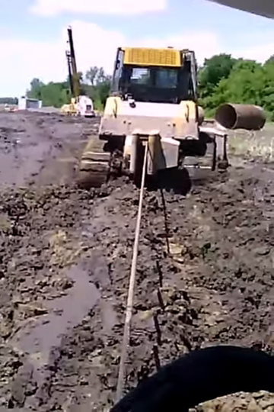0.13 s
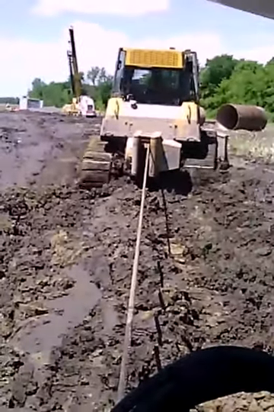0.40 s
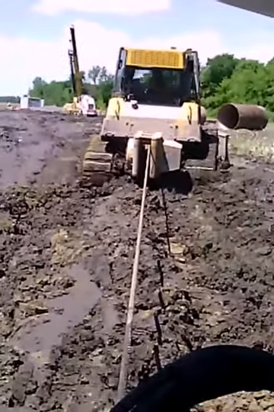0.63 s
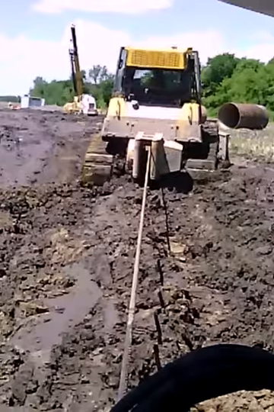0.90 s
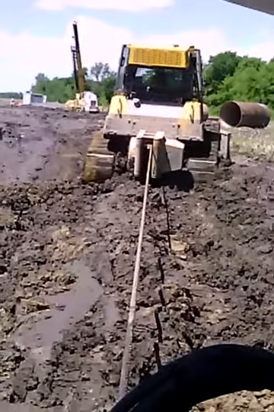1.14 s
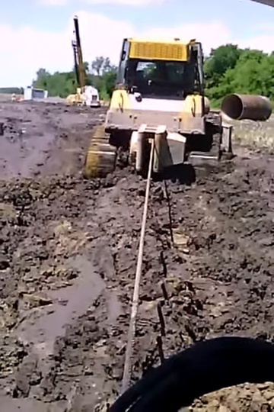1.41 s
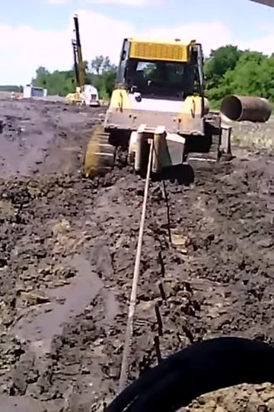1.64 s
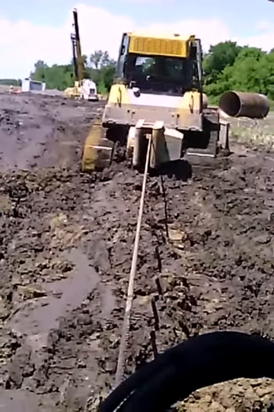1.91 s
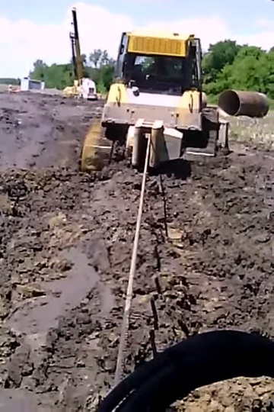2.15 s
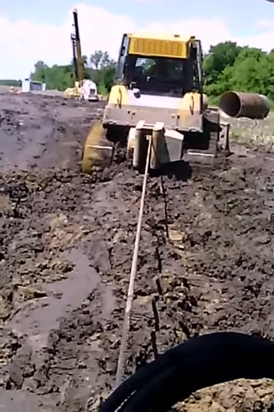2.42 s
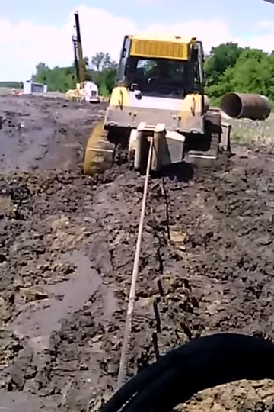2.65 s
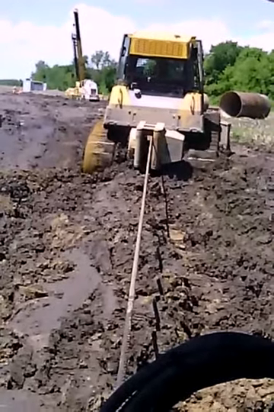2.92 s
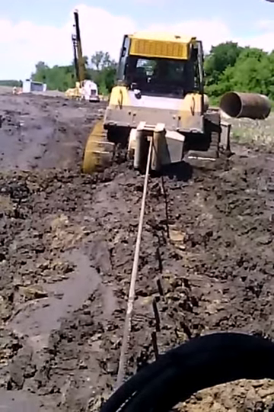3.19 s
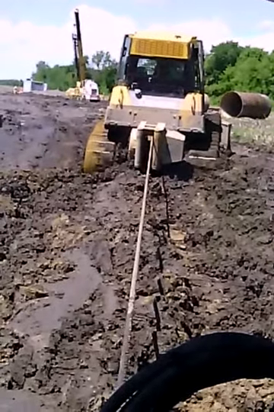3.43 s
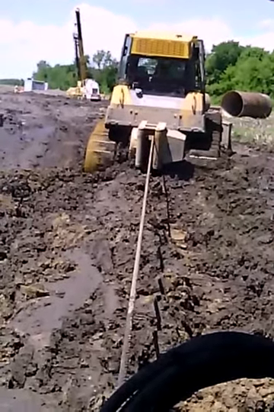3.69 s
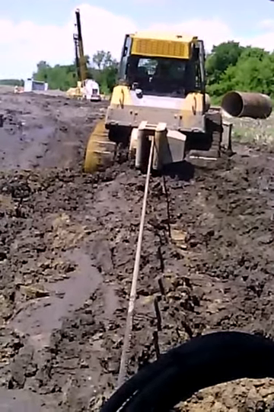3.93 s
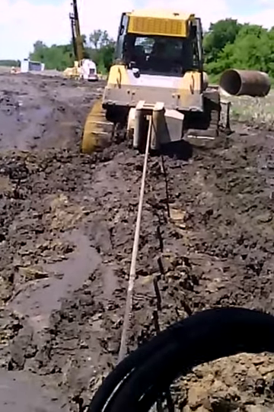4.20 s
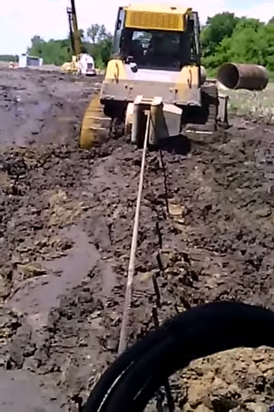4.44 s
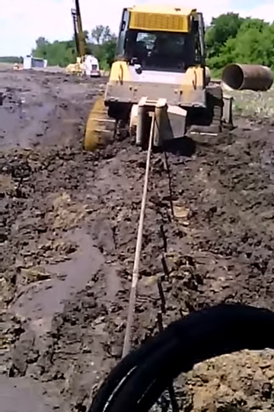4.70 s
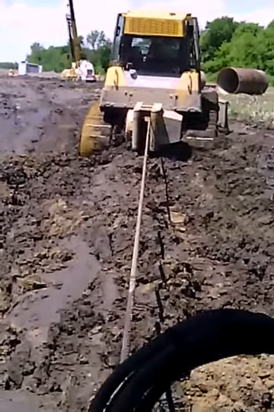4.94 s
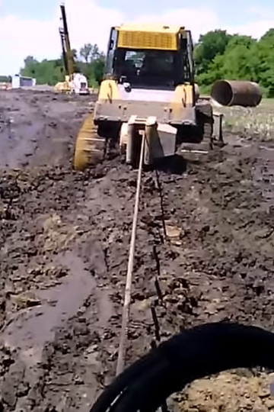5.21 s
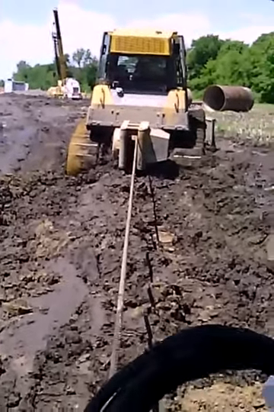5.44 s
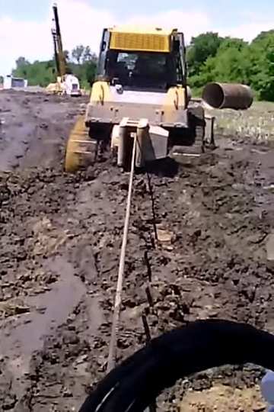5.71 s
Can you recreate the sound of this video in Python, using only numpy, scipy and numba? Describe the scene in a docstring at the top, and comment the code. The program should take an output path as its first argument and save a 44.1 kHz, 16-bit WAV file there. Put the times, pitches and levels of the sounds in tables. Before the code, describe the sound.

Close inside a vehicle cab, a heavy diesel runs at high revs with clatter and air hiss, then sinks quickly to a low, whining idle by two seconds. A panel squeaks in quick pulses. Near the five-second mark, a burst of hiss and a powerful boom arrive as the engine pulls, overloading the microphone; heavy thumps shake the cab at the end.

```python
"""A six-cylinder diesel, heard inside its truck cab on a tow rope, drops from high revs to idle, then pulls.
Firings boom as a tone lifted by the cab; a pump and a turbo whine as tones, and valves clatter as pulsed noise.
Intake air hisses as filtered noise; gears whine and panels squeak in swelling tones, and the lurching cab
thumps in decaying modes. The boom overloads both microphone ports, which slew in clean ramps and chop the
treble."""
import sys
import numpy as np
from scipy import signal
from scipy.fft import rfft, irfft
from scipy.io import wavfile
from scipy.ndimage import uniform_filter1d, minimum_filter1d
from numba import njit

SR = 44100
rng = np.random.default_rng(int(sys.argv[2]) if len(sys.argv) > 2 else 0)


def to_wav(s):
    """Save 16-bit WAV."""
    ch = np.atleast_2d(s).T  # columns
    pcm = np.round(np.clip(ch, -1, 1) * 32767)  # PCM
    wavfile.write(sys.argv[1], SR, pcm.astype(np.int16))


def volts_from_decibels(level):
    """Turn decibel levels (scalar or array-like) into linear amplitude factors."""
    exponent = np.asarray(level, float) / 20
    return 10 ** exponent


N = 257533
T = np.arange(N) / SR


def curves(table):
    """Linear interpolation: the columns of a (time [s], ..) table become continuous tracks."""
    s, *columns = np.transpose(table)
    return [np.interp(T, s, column) for column in columns]


def on_log(table, hz):
    """Spectral envelope: reads (frequency [Hz], level [dB]) points on a log-frequency axis."""
    f, db = np.transpose(table)
    return np.interp(np.log(hz), np.log(f), db, left=db[0], right=db[-1])


def colour(x, table):
    """Linear filtering: multiplies the spectrum of x by the table, silent outside it; rms 1."""
    hz = np.arange(N // 2 + 1) * SR / N + 1e-3  # keeps the logarithm finite
    inside = (hz > table[0][0]) & (hz < table[-1][0])
    y = irfft(rfft(x) * volts_from_decibels(on_log(table, hz)) * inside, N)
    return y / np.std(y)


def with_peaks(x, table, peaks):
    """Resonance: coloured noise plus the narrow bands of the modes that it excites."""
    hz = np.arange(N // 2 + 1) * SR / N
    bells = sum(volts_from_decibels(db) / np.sqrt(width) / (1 + 2j * (hz - f) / width) for f, width, db in peaks)
    rung = irfft(rfft(x) * bells, N) * np.sqrt(SR / np.pi)
    return colour(x, table) + rung / np.std(x)


def walk(rate):
    """Random modulation: levels held 1 / rate s, smoothed twice; standard deviation 1."""
    k = int(SR / rate)
    steps = np.repeat(rng.standard_normal(N // k + 1), k)
    w = uniform_filter1d(uniform_filter1d(steps, k), k)[:N]
    return w / np.std(w)


def ring(x, hz, t60):
    """Damped free vibration: one mode losing 60 dB in t60 s; a unit click gives about a unit peak."""
    pole = np.exp(2j * np.pi * hz / SR - np.log(1000) / (t60 * SR))
    return signal.lfilter([1], [1, -pole], x).imag


def puffs(cycles, depth, decay, flicker_db):
    """Amplitude modulation: noise jumps at every firing and dies away, over a steady share."""
    gate = 1 + depth * np.exp(-(cycles % 1) / decay)  # decay in firing periods
    return rng.standard_normal(N) * gate * volts_from_decibels(flicker_db * walk(25))


# cab rocking on its mounts: (frequency [Hz], relative level [dB per Hz])
SWAY = [(38, -9), (55, -2), (68, -5.5), (80, -15)]


def sway():
    """Random vibration: band-limited low noise from the cab on its mounts, slowly varying in level."""
    return volts_from_decibels(-21.5 + 1.6 * walk(8)) * colour(rng.standard_normal(N), SWAY)


# thin turbo whistle: (time [s], frequency [Hz], level [dB])
TURBO = [(0, 14000, -57), (.75, 12500, -56), (1.17, 13900, -54), (1.55, 11200, -58), (1.9, 9000, -59),
         (2.2, 8000, -55), (2.6, 6700, -50), (3.0, 6200, -49), (3.5, 5600, -54), (4.2, 5200, -60),
         (4.8, 5400, -58), (5.3, 6700, -41), (5.5, 7200, -44), (5.84, 8000, -50)]


def turbo():
    """Frequency modulation: a whistle whose pitch and level waver about their tracks."""
    hz, level_db = curves(TURBO)
    phase = np.cumsum(hz * (1 + .011 * walk(500))) / SR
    return volts_from_decibels(level_db + 2 * walk(150)) * np.sin(2 * np.pi * phase)


# intake air: (time [s], hiss level [dB], top air level [dB])
AIR = [(0, -34.5, -57), (.7, -37.5, -58), (1.0, -34.5, -53), (1.2, -36, -63), (1.6, -40.5, -71),
       (2.1, -46, -67), (2.5, -43.5, -53.5), (3.0, -43.5, -57.5), (3.85, -45.5, -54.5), (4.0, -47.5, -67),
       (4.2, -44, -58), (4.7, -41, -59.5), (4.82, -24.5, -70), (4.95, -37.5, -53), (5.05, -29.5, -56),
       (5.35, -33.5, -55), (5.6, -39.5, -59), (5.84, -46.5, -59)]
# spectrum of the hiss: (frequency [Hz], relative level [dB per Hz])
HISS = [(2060, -16), (3500, -1), (3950, -17), (4290, -3), (5190, -4), (8360, 1), (9350, -6), (10600, -15.5),
        (11200, -20.5), (14600, -70), (22000, -120)]
# ducts rung by the hiss: (frequency [Hz], width [Hz], relative level [dB])
DUCTS = [(6390, 400, -11.5), (7060, 130, -14), (7560, 59, -13), (8240, 88, -11), (9840, 130, -27),
         (10340, 150, -18.5)]
# spectrum of the top air: (frequency [Hz], relative level [dB per Hz])
TOP_AIR = [(6590, 0), (11200, 0.5), (13100, -8), (14500, -48), (15100, -13), (15900, -14)]
# ducts rung by the top air: (frequency [Hz], width [Hz], relative level [dB])
TOP_DUCTS = [(10390, 73, 1), (12560, 200, -13.5)]


def intake_air(cycles):
    """Flow noise: air pulsed by the firings hisses and excites duct resonances."""
    hiss_db, top_db = curves(AIR)
    gas = puffs(cycles, depth=0.17, decay=0.45, flicker_db=0.18)
    hiss = volts_from_decibels(hiss_db) * with_peaks(gas, HISS, DUCTS)
    return hiss + volts_from_decibels(top_db) * with_peaks(gas, TOP_AIR, TOP_DUCTS)


# brief gear whines and panel squeaks: (swell centre [s], peak before flutter [dB], Gaussian spread [s],
# frequency [Hz])
TONE_BURSTS = [(0.518, -39, 0.07, 2930), (1.003, -34.5, 0.048, 2900), (1.352, -33, 0.026, 2000),
               (2.441, -25, .013, 711), (2.5, -21, 0.014, 711), (2.552, -22.5, 0.016, 711),
               (2.614, -28, 0.016, 711), (2.667, -46, 0.013, 711)]


def tone_bursts():
    """Gaussian tone bursts: gears whine and a loose panel squeaks in swells, each a slightly unsteady note."""
    clock = np.cumsum(1 + .006 * walk(60)) / SR
    bursts = sum(volts_from_decibels(db) * np.exp(-.5 * ((T - s) / spread) ** 2) * np.sin(2 * np.pi * hz * clock)
                 for s, db, spread, hz in TONE_BURSTS)
    return bursts * volts_from_decibels(0.76 * walk(90))


# metal ticks: (onset [s], peak level [dB], frequency [Hz])
CHIRPS = [(1.118, -23, 7960), (2.4838, -35, 8790)]


def ticks():
    """Short wave packets: metal sounds high and briefly under a Gaussian envelope."""
    return sum(volts_from_decibels(db) * np.exp(-.5 * ((T - s - .004) / 0.0036) ** 2) * np.sin(2 * np.pi * hz * T)
               for s, db, hz in CHIRPS)


# thumps of the lurching cab: (time [s], peak [dB], ring [Hz], rattle drive before a 12 dB cut [dB])
THUMPS = [(5.385, -7, 107.6, -38), (5.644, -13, 130.5, -41), (5.686, -10.5, 117, -28),
          (5.703, -7, 118.7, -57), (5.771, -6, 116.3, -25), (5.788, -4.5, 129.6, -45)]


def thumps():
    """Impulse response: each impulse rings a low mode, and a noise burst rattles a higher one."""
    out = np.zeros(N)
    for s, db, hz, rattle_db in THUMPS:
        click = np.zeros(N)
        click[int(s * SR)] = 1
        decay = signal.lfilter([1], [1, -np.exp(-1 / (0.0067 * SR))], click)
        rattle = decay * rng.standard_normal(N)
        out += volts_from_decibels(db) * ring(click, hz, 0.13) + volts_from_decibels(rattle_db - 12) * ring(rattle, 1600, 0.013)
    return out


# shudder at each lurch: (start [s], rise and hold [s], level before lumps [dB])
SHUDDER = [(5.365, 0.076, -20), (5.633, .095, -14), (5.768, 0.045, -13)]
# spectrum of the shudder: (frequency [Hz], relative level [dB per Hz])
SHUDDER_COLOUR = [(53, -41), (90, -16), (129, 1), (269, -16), (304, -10.5), (436, -21), (533, -26.5),
                  (1190, -47), (2200, -54), (2860, -74), (4840, -120)]


def shudder():
    """Transient random vibration of seat, doors and dash: quick rise, hold, exponential fall."""
    rise_s, fall_db_per_s = 0.0076, 334
    size = 0
    for s, length, db in SHUDDER:
        fall_db = fall_db_per_s * np.maximum(T - s - length, 0)
        size = size + np.clip((T - s) / rise_s, 0, 1) * volts_from_decibels(db - fall_db)
    lumps = rng.standard_normal(N) * size * volts_from_decibels(2 * walk(70))
    return colour(lumps, SHUDDER_COLOUR) * np.std(lumps)


# mean strength of each firing, one entry per cylinder: (level [dB])
CYLINDERS_DB = [-5, 3.5, 0, -2, 0, -21]
# spectrum of firings and shake: (frequency [Hz], relative level [dB per Hz])
RUMBLE = [(18, -49), (30, -8), (59, 2), (134, 1.5), (163, 0.5), (233, -12.5), (362, -8), (417, -18.5),
          (461, -15.5), (792, -25.5), (900, -24), (1170, -61.5), (1980, -120)]


def rumble(cycles):
    """Pulse-train excitation: uneven, soft firings mixed with random road and body shake."""
    count = np.floor(cycles).astype(int)
    size_db = np.resize(CYLINDERS_DB, count[-1] + 1) + 2.7 * rng.standard_normal(count[-1] + 1)
    impulses = np.diff(count, prepend=0) * volts_from_decibels(size_db)[count]
    pushes = np.convolve(impulses, np.hanning(int(.003 * SR)), "same")
    shake = colour(rng.standard_normal(N), RUMBLE) * volts_from_decibels(2 * walk(14))
    return .35 * colour(pushes, RUMBLE) + 0.92 * shake


# timing gears: (teeth meshed per firing, mean level at 85 firings/s relative to the clatter noise [dB])
GEARS = [(12, -6), (26, -17)]


def gears(hz):
    """Tooth-mesh tones: rough whines come and go, and fade as the revs fall."""
    out = 0
    for teeth, db in GEARS:
        phase = np.cumsum(teeth * hz * (1 + .012 * walk(80))) / SR
        out = out + volts_from_decibels(db + 3.9 * walk(9)) * np.sin(2 * np.pi * phase)
    return out * volts_from_decibels(0.14 * (hz - 85))


# spectrum of the valves: (frequency [Hz], relative level [dB per Hz])
CLATTER = [(180, -30), (300, -5), (352, 2.5), (421, -18.5), (467, -6.5), (541, -3.5), (710, -2), (786, -22),
           (880, -2.5), (1280, -6.5), (2360, -5), (3970, -18), (4500, -25), (5850, -19), (9900, -120)]
# panels rung by the clatter: (frequency [Hz], width [Hz], relative level [dB])
PANELS = [(369.6, 21, -5), (468, 28, -10), (711, 28, -8.5), (865, 69, -9.5), (985, 110, -12),
          (1745, 83, -17.5), (2093, 150, -20.5), (3288, 20, -18.5)]


def clatter(hz, cycles):
    """Modulated impact noise: valves clatter with each firing, ring panels and join the gears."""
    valves = puffs(cycles, depth=0.21, decay=0.27, flicker_db=0.49)
    return with_peaks(valves, CLATTER, PANELS) + gears(hz)


# multiples of the firing rate: (subtone, boom, octave, twelfth, pump, pump octave)
MULTIPLES = [2 / 3, 1, 2, 3, 3.32, 6.64]
# lift of low tones in the closed cab: (frequency [Hz], gain [dB])
CAB = [(30, 24.5), (40, 13), (55, 5.5), (90, 1), (200, -1)]


def engine_tone(index, hz, cycles, level_db):
    """Harmonic synthesis: a phasor locked to the firings and lifted by the cab; rms level before the lift."""
    k = MULTIPLES[index]
    return np.sqrt(2) * volts_from_decibels(level_db + on_log(CAB, k * hz)) * np.exp(2j * np.pi * k * cycles)


# pump before the cab's lift: (time [s], tone level [dB], octave level [dB])
PUMP = [(0, -32.5, -35.5), (1.2, -30, -36), (1.4, -37, -47), (1.8, -49, -56), (1.9, -33, -31),
        (2.0, -24, -55), (2.1, -20, -48), (2.4, -26, -40), (2.52, -38, -41.5), (2.75, -20, -31.5),
        (3.4, -22.5, -34), (4.3, -25, -38), (4.65, -26.5, -37.5), (4.8, -40.5, -53), (5.3, -39, -48.5),
        (5.7, -20.5, -47), (5.84, -25.5, -38.5)]


def pump(hz, cycles):
    """Phase-locked tones: the pump and its octave run true with the engine."""
    tone_db, octave_db = curves(PUMP)
    return engine_tone(4, hz, cycles, tone_db) + engine_tone(5, hz, cycles, octave_db)


# brief side tones: (centre [s], Gaussian spread [s], multiple of the firing rate, peak level [dB rms])
SWELLS = [(0.097, 0.027, 1, -20), (0.214, 0.062, .667, -18), (0.872, 0.064, 2, -22),
          (0.95, 0.097, .667, -13.5), (1.348, 0.0416, 3.32, -25), (1.712, 0.013, 3, -27),
          (1.92, 0.042, 3, -22.5), (2.16, 0.065, 2, -14.5), (4.615, 0.082, 2.4, -21.5),
          (5.47, 0.083, 2, -18)]


def swells(cycles):
    """Gaussian amplitude modulation: each bell-shaped tone rides on the revs."""
    return sum(np.sqrt(2) * volts_from_decibels(db) * np.exp(-.5 * ((T - s) / spread) ** 2 + 2j * np.pi * k * cycles)
               for s, spread, k, db in SWELLS)


# air modes that lift the side tones: (frequency [Hz], width [Hz], level [dB])
CAB_MODES = [(58, 8.3, 14.5), (165.5, 16, 11.5)]


def cab_modes(hz):
    """Room resonance: gain of a tone passing through the cab's air modes."""
    power = sum(volts_from_decibels(db) ** 2 / (1 + (2 * (hz - f) / width) ** 2) ** 2 for f, width, db in CAB_MODES)
    return np.sqrt(1 + power)


# subtone, octave, twelfth, away from the air modes and before the cab's lift: (mean level [dB])
SIDE_DB = [-41, -39, -36.5]


def side_tones(hz, cycles):
    """Cylinder unevenness: wavering tones beside the boom, lifted by the air modes."""
    return sum(engine_tone(i, hz, cycles, db) * cab_modes(MULTIPLES[i] * hz) * volts_from_decibels(3.9 * walk(14))
               for i, db in zip((0, 2, 3), SIDE_DB))


# engine: (time [s], firing rate [Hz], boom level before the cab's lift [dB])
ENGINE = [(0, 89.23, -22.5), (.4, 85.7, -24), (.7, 80.94, -25), (1.0, 83.82, -25), (1.13, 86.1, -38),
          (1.3, 78.96, -19.5), (1.5, 62.8, -21.5), (1.62, 53.35, -15), (1.73, 51.3, -12.5),
          (1.81, 45.53, -26), (1.92, 39.66, -38), (2.1, 30.84, -32), (2.3, 33.89, -24.5),
          (2.6, 36.6, -23.5), (3.0, 38.84, -21.5), (3.6, 39.87, -17.5), (4.4, 39.76, -18.5),
          (4.7, 41.79, -14), (4.77, 43.95, -7.5), (4.81, 45.3, -5.5), (4.87, 47.27, -5), (4.95, 50.7, -8),
          (5.0, 51.8, -3.5), (5.11, 52.62, -2.5), (5.24, 54.88, -2.5), (5.3, 55.88, -3.5), (5.4, 58, -5),
          (5.6, 58.17, -5.5), (5.78, 59.86, -7), (5.84, 59.5, -7)]


def firing_boom():
    """Phase integration: the firing rate sums to firing cycles, whose fundamental is the boom."""
    hz, level_db = curves(ENGINE)
    cycles = np.cumsum(hz) / SR
    return hz, cycles, engine_tone(1, hz, cycles, level_db)


@njit
def slew(x, step):
    """Slew-rate limiting: follows x at a limited speed and tells where it keeps up."""
    y, locked, at = np.empty(len(x)), np.empty(len(x)), x[0]
    for i in range(len(x)):
        locked[i] = abs(x[i] - at) <= step[i]
        at += min(max(x[i] - at, -step[i]), step[i])
        y[i] = at
    return y, locked


# speed limit, loosest while the cab is quiet and once it lurches: (time [s], limit [full scale/s])
SLEW = [(0, 365), (1.5, 330), (2.0, 560), (4.62, 560), (4.76, 366), (5.27, 387), (5.6, 462), (5.64, 650),
        (5.84, 985)]


def port(x):
    """Slew-induced distortion: bass outruns the stage, and treble passes only while it keeps up."""
    bass = signal.sosfilt(signal.butter(1, 350, fs=SR, output="sos"), x)
    ramp, locked = slew(bass, curves(SLEW)[0] / SR)
    # the stage needs a moment of tracking before it settles
    settled = uniform_filter1d(minimum_filter1d(locked, size=2), size=7)
    return uniform_filter1d(ramp, size=3) + settled * (x - bass)


def scene():
    """Superposition: engine, cab and air sounds add, then pass through two ports."""
    hz, cycles, boom = firing_boom()
    # engine noise grows with the revs above idle and changes under the pull
    above_idle_hz = hz - 38
    pull = np.clip((T - 4.72) / .08, 0, 1)  # start and rise in s
    rumble_db = -30 + 0.27 * above_idle_hz - 2 * pull
    clatter_db = -39 + 0.17 * above_idle_hz - 2.1 * pull

    air = intake_air(cycles) + turbo()
    cab = sway() + tone_bursts() + ticks() + thumps() + shudder()
    noise = volts_from_decibels(rumble_db) * rumble(cycles) + volts_from_decibels(clatter_db) * clatter(hz, cycles)
    whine = (pump(hz, cycles) + swells(cycles) + side_tones(hz, cycles)).imag
    rest = air + cab + noise + whine

    near = port(boom.imag + rest)
    # the far port hears the boom at another point of its cycle and weighs less in the mix
    far = port((boom * np.exp(1j * 1.95)).imag + rest)
    return (near + 0.37 * far)[None]


def low_pass(x):
    """Removes everything above the highest recorded frequency."""
    return signal.sosfilt(signal.butter(12, 16460, fs=SR, output="sos"), x)


def record(dry):
    """High-pass filtering and hard limiting: cuts the bass in two stages and clips the last peaks."""
    x = signal.sosfilt(signal.butter(2, 75, "high", fs=SR, output="sos"), dry)
    x = signal.sosfilt(signal.butter(2, 37, "high", fs=SR, output="sos"), x)
    return low_pass(np.clip(x, -1, 1))


dry = scene()
out = record(dry)
to_wav(out)
```